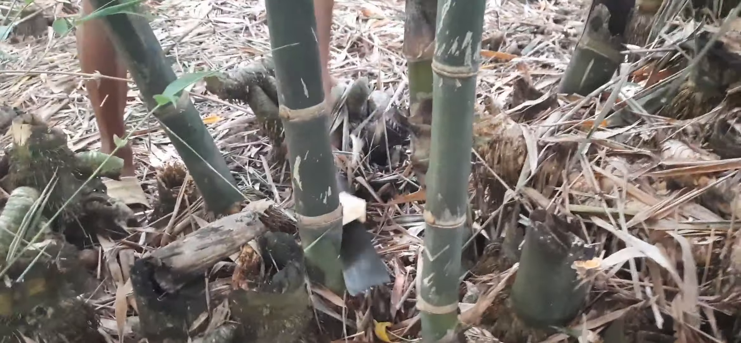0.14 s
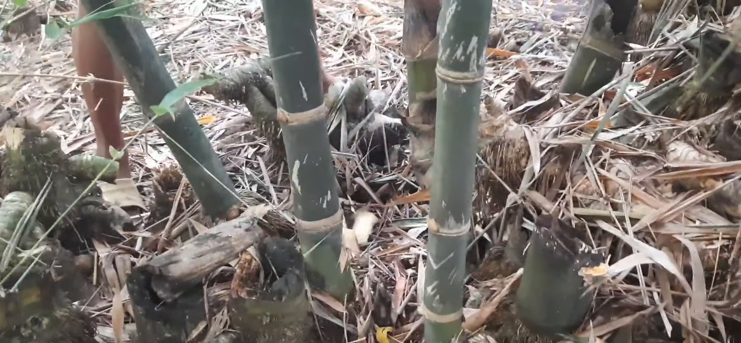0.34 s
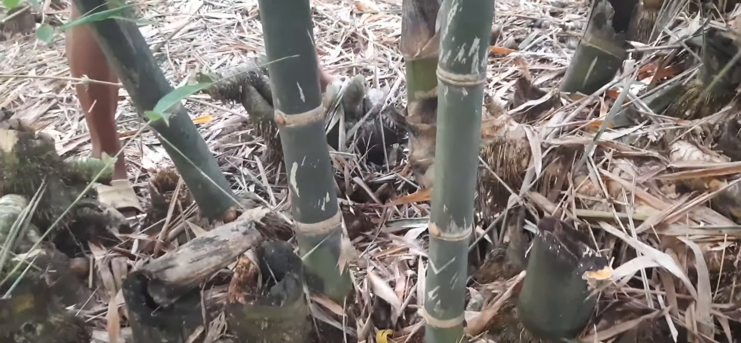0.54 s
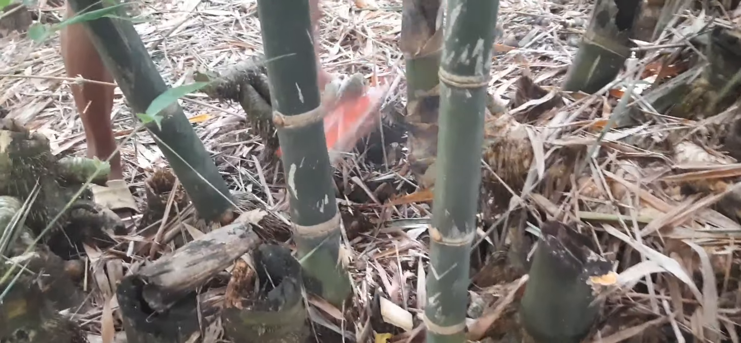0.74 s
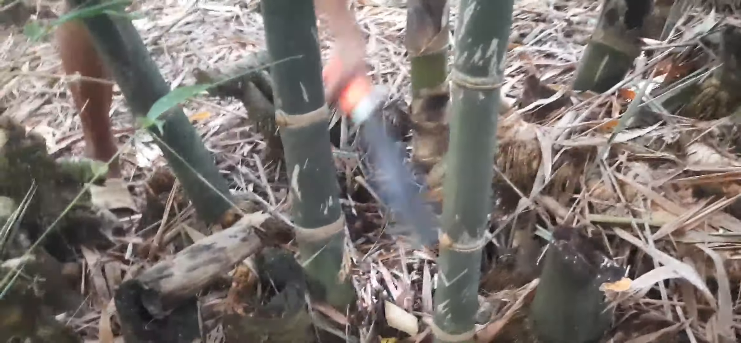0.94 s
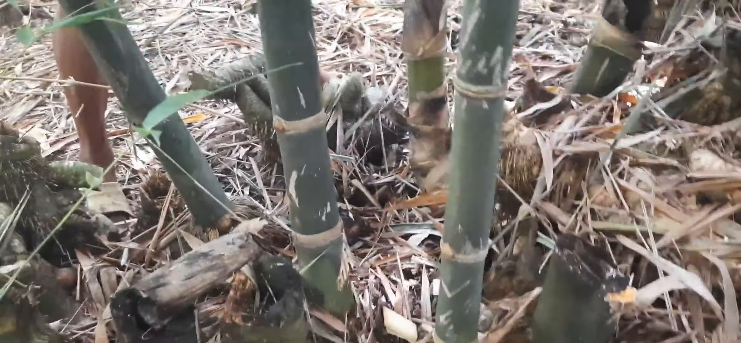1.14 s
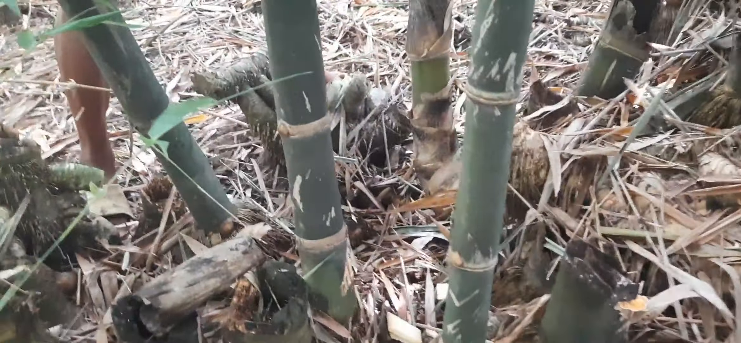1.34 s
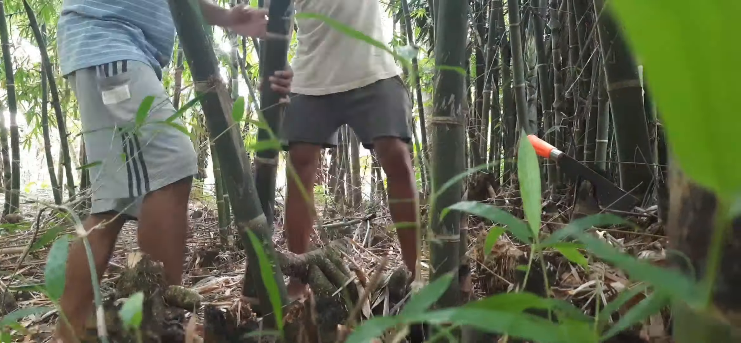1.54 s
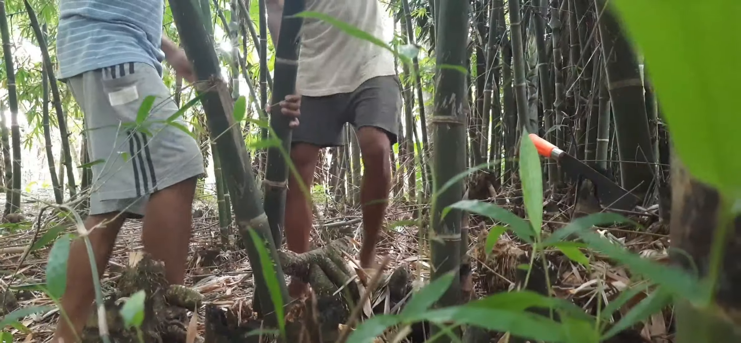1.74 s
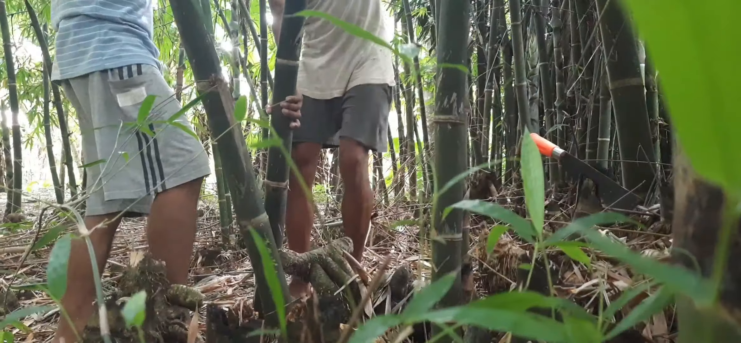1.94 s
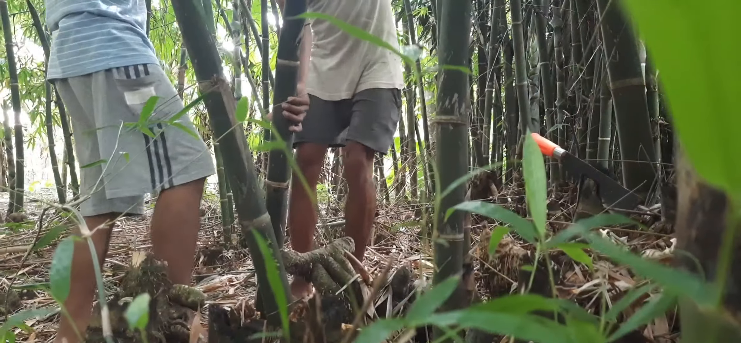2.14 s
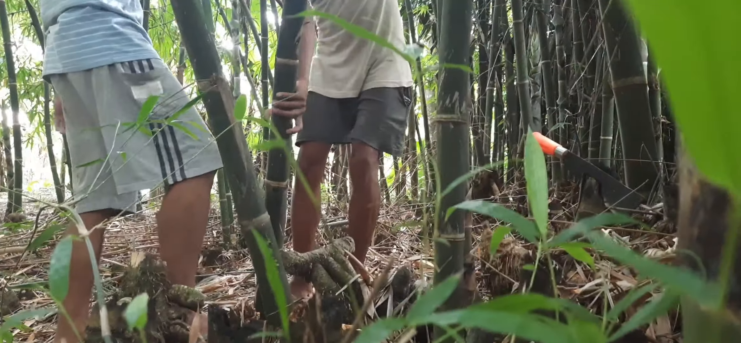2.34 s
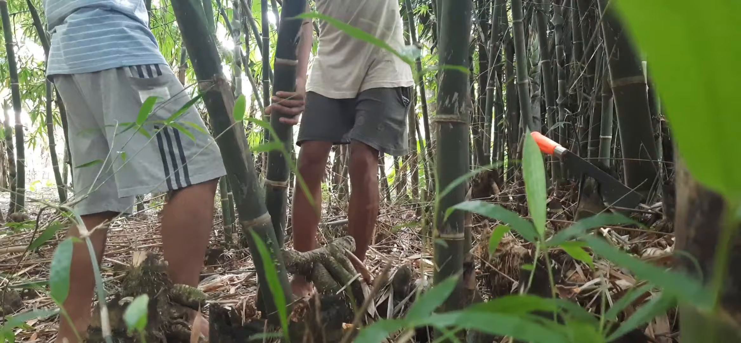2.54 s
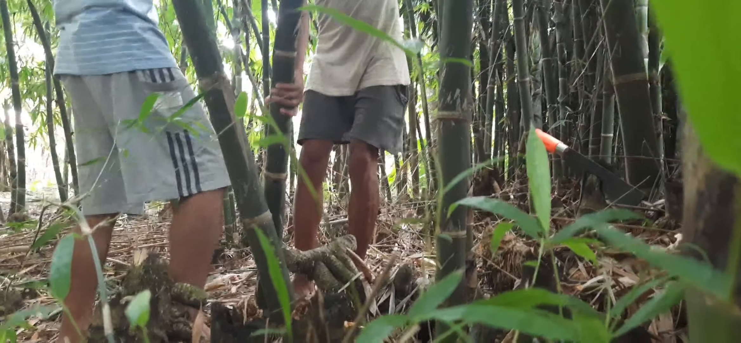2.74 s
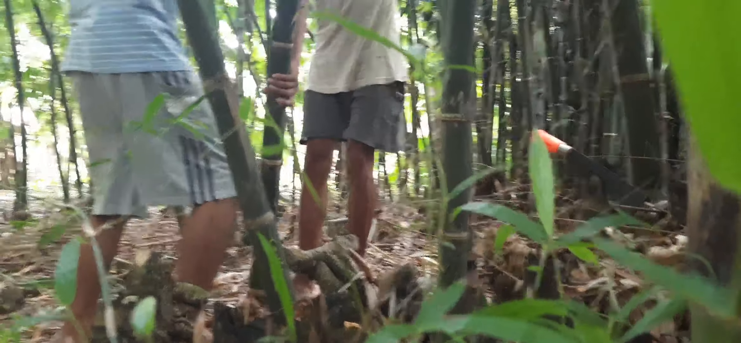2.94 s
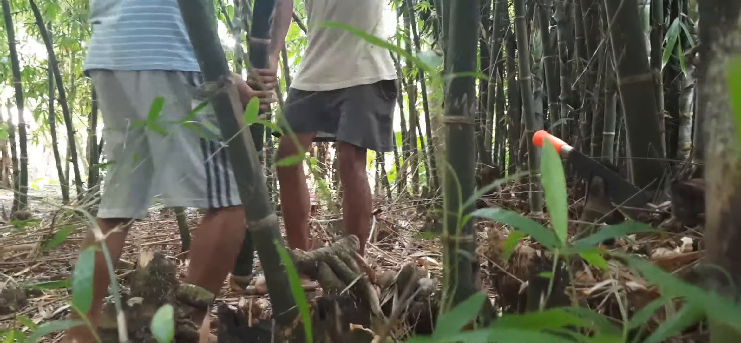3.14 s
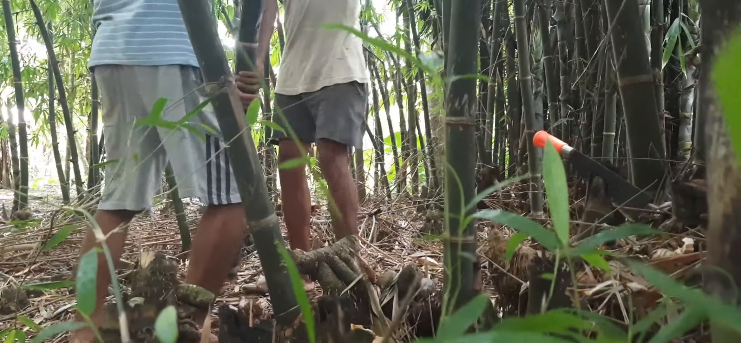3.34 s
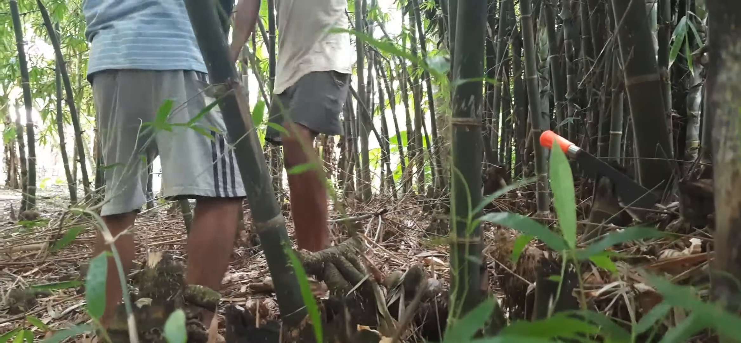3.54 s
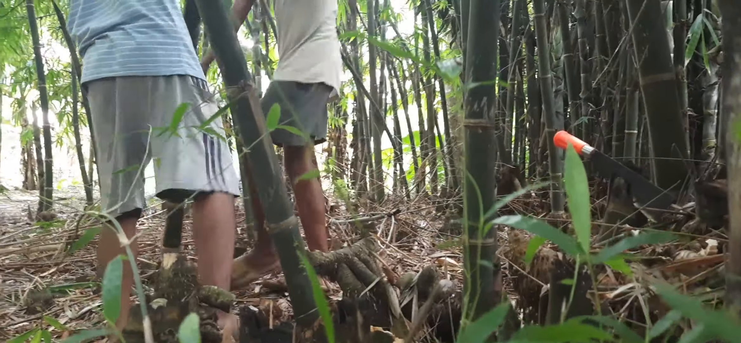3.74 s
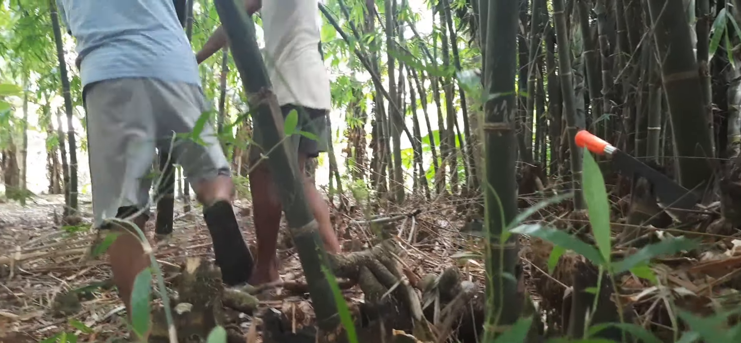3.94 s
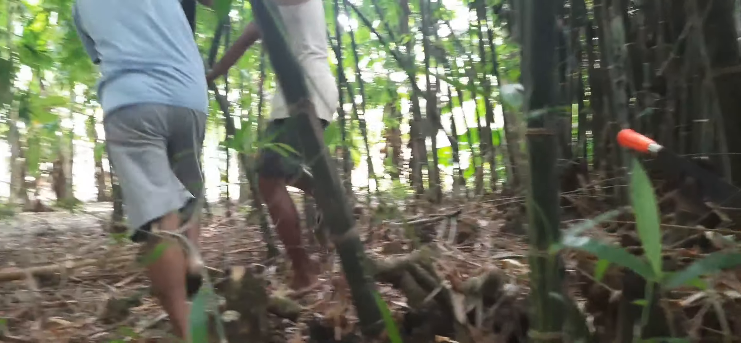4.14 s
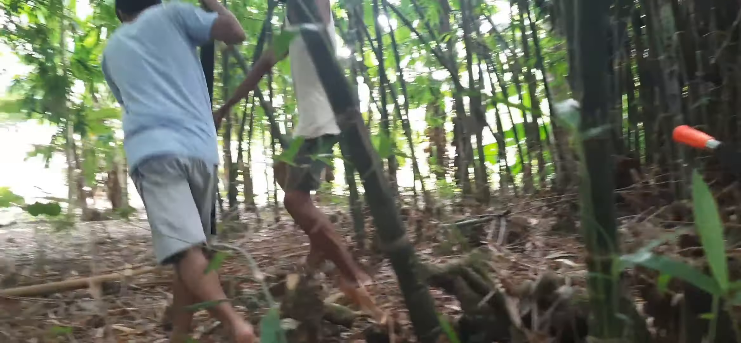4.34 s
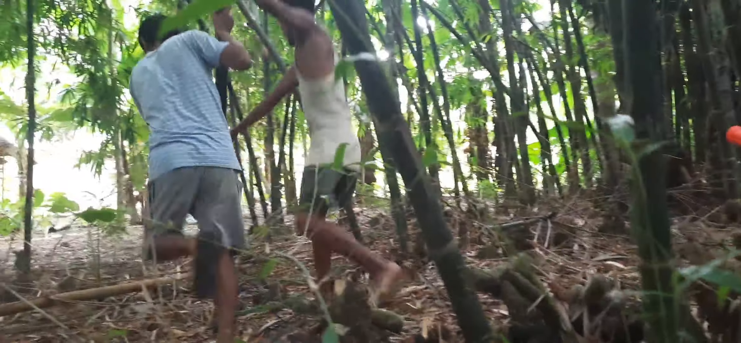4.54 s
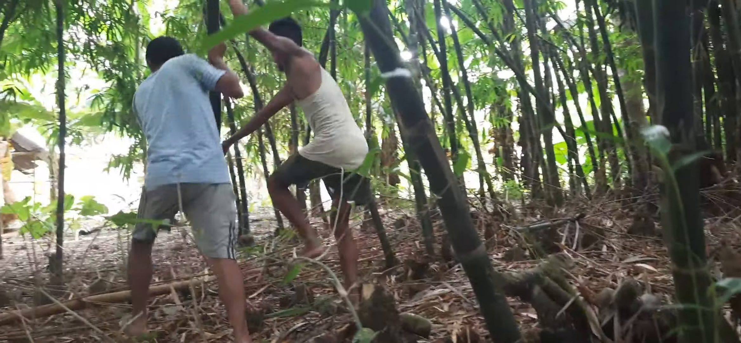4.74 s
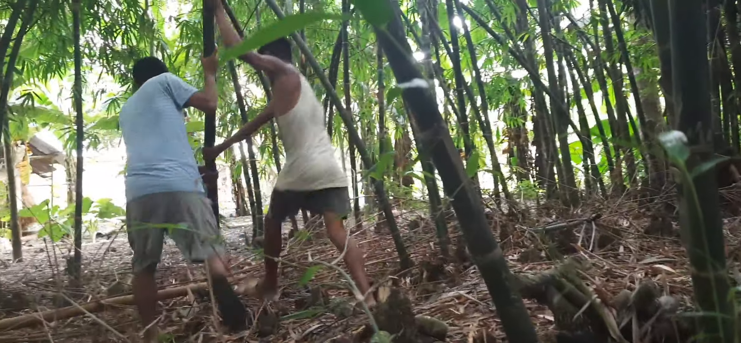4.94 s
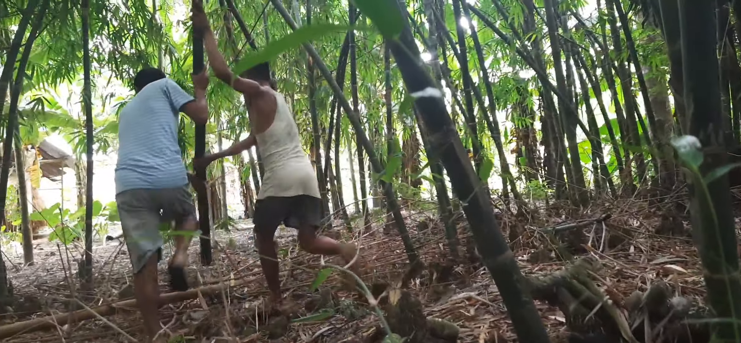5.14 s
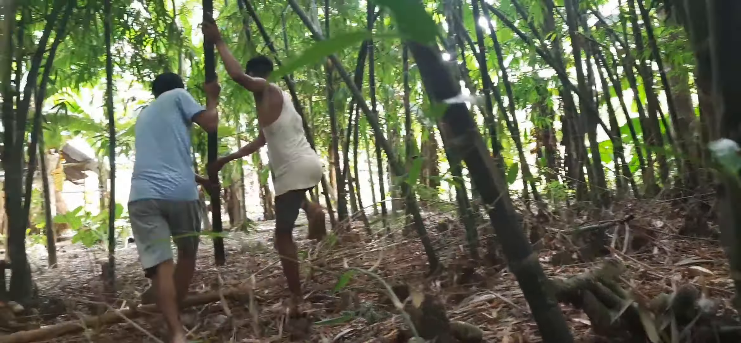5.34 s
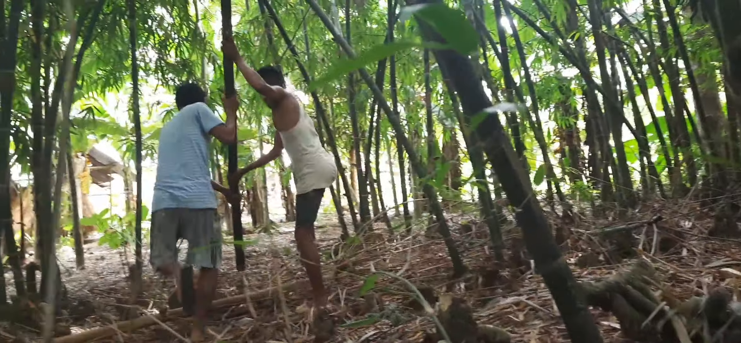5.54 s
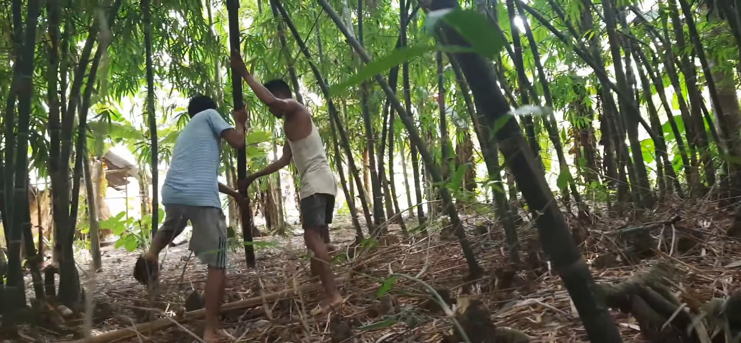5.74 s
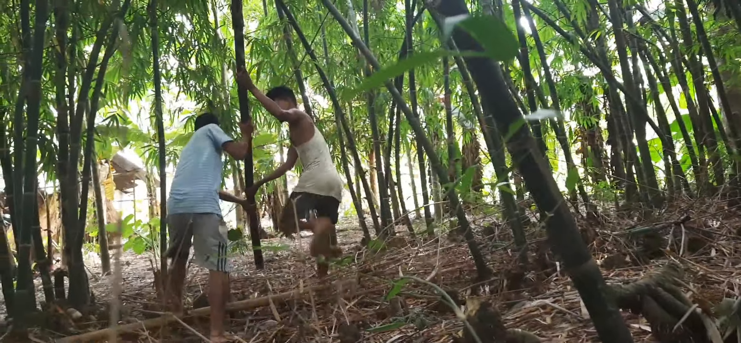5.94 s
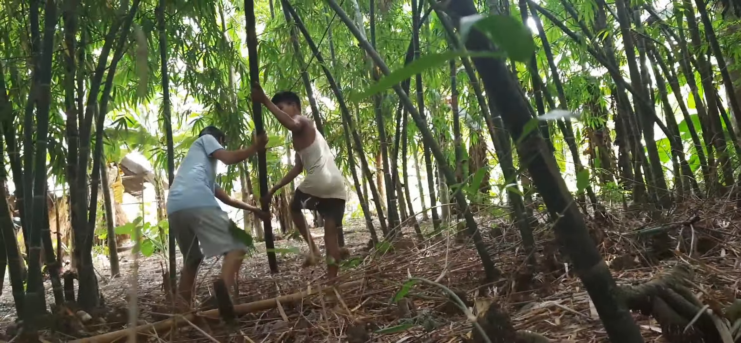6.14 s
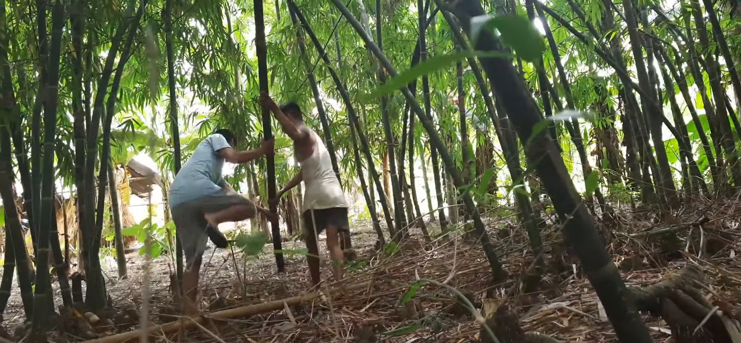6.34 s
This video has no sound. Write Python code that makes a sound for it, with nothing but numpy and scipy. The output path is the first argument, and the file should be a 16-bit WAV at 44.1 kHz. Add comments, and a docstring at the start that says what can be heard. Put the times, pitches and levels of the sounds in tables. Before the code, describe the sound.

Three sharp blade chops ring through a bamboo grove, followed by swelling leaf rustle, snapping twigs and footfalls as the pole is pulled free.

```python
"""A faint bird whistles far off, and at once a machete bites three times into a green bamboo stem nearby.
Each bite bursts the fibres, makes the hollow stem ring and echoes through the grove.
Then the cut pole is dragged out of the clump: the harder the pull, the louder its leafy top rustles
through the others. Stems knock together, twigs snap, and feet shuffle, thud and crunch in the dry
litter on the ground. A low outdoor rumble lies under it all."""
import sys
import numpy as np
from scipy import signal
from scipy.fft import rfft, irfft
from scipy.io import wavfile
from scipy.ndimage import uniform_filter1d

SR = 44100
rng = np.random.default_rng(int(sys.argv[2]) if len(sys.argv) > 2 else 0)


def dump_mix(stems):
    """Bounce the given channels to the path in sys.argv[1] as a 16-bit WAV at rate SR."""
    frames = np.atleast_2d(stems).T  # one column per channel
    limited = np.clip(frames, -1, 1)  # hard clip at full scale
    pcm = np.round(limited * 32767).astype(np.int16)
    wavfile.write(sys.argv[1], SR, pcm)


N = 286650
TIME = np.arange(N) / SR
DRAG_FADE_IN = np.clip((TIME - 1.55) / .02, 0, 1)  # the dragging starts at 1.55 s

# tone of the outdoor air: f/Hz, level/dB
AIR_TONE = [(25, -27.5), (60, -0.5), (110, -3.5), (260, -10), (500, -22.5), (1200, -21.5), (4000, -18.5),
            (16000, -28.5)]
# far bird whistles: t/s, length/s, start f/Hz, end f/Hz, level/dB
WHISTLES = [(0, .08, 5550, 4850, -56), (0, 0.067, 4250, 3390, -53), (.39, .1, 4300, 3780, -59.5),
            (.55, .17, 4450, 3850, -58.5)]
# tone of the dry litter on the ground: f/Hz, level/dB
LITTER_TONE = [(35, -14.5), (90, -3.5), (180, -3.5), (330, -2), (500, -7), (700, -6), (1100, -4.5),
               (2000, -10), (6000, -42.5)]
# how loudly the feet shuffle: t/s, level/dB
SHUFFLE_LEVEL = [(2.9, -80), (3.3, -69.5), (3.98, -56), (4.1, -48.5), (4.39, -49.5), (4.47, -56),
                 (4.56, -48), (5.6, -46.5), (5.8, -50), (6.1, -44), (6.33, -55.5), (6.45, -47)]
# feet crushing the litter: t/s, length/s, level/dB, centre f/Hz
FOOT_CRUNCHES = [(4.044, 0.06, -42.5, 445), (4.518, 0.064, -45.5, 654), (4.939, 0.15, -39, 507)]
# feet and pole landing on the ground: t/s, level/dB, centre f/Hz
GROUND_THUDS = [(.955, -35.5, 450), (1.79, -41.5, 378), (2.14, -52, 300), (3.313, -40, 336),
                (4.035, -31.5, 367), (4.143, -37, 290), (4.706, -29.5, 280), (4.943, -30.5, 101),
                (5.21, -24.5, 306), (5.261, -28.5, 300), (5.402, -27.5, 316), (5.687, -26, 333),
                (5.988, -29.5, 393), (6.42, -31, 375)]
# how hard the pole is pulled, as the loudness of its rustle: t/s, level/dB
PULL_LEVEL = [(1.62, -60), (1.92, -61.5), (2.02, -53), (2.45, -70), (2.65, -67), (2.73, -64.5),
              (3.1, -58.5), (3.25, -54), (3.62, -57), (3.94, -46), (4.38, -43), (4.46, -45), (4.68, -38),
              (4.9, -39.5), (5.05, -35), (5.15, -40.5), (5.35, -41), (5.62, -37.5), (5.76, -42.5),
              (6.05, -36.5), (6.36, -42.5), (6.45, -39)]
# twigs scraping, compared with the leaves: t/s, level/dB
SCRAPE_LEVEL = [(2.66, -7), (2.72, -0.5), (3.1, -3), (6.45, -5)]
# tone of brushing leaves: f/Hz, level/dB
LEAF_TONE = [(1500, -12), (3500, -3.5), (5500, -0.5), (7500, 0), (10000, -5), (13000, 0.5), (16000, -10.5)]
# tone of scraping twigs: f/Hz, level/dB
TWIG_TONE = [(500, -29.5), (1100, -9.5), (1800, 0), (2400, 2.5), (3200, -2.5), (6000, -9.5), (12000, -39.5)]
# stems knocking and twigs snapping: t/s, level/dB, centre f/Hz, decay/s, splinters against the knock/dB
STEM_KNOCKS = [(.651, -66, 6030, .08, 13.5), (1.058, -48.5, 1300, 0.024, -7), (1.181, -53, 1900, .03, 5),
               (1.276, -49.5, 7030, .04, 5), (1.777, -39, 1642, 0.054, -28.5),
               (2.045, -53.5, 5930, 0.029, 15), (3.315, -48, 1700, .04, -15.5),
               (3.423, -48, 1380, 0.053, -14), (3.606, -49, 1000, 0.048, -6),
               (3.738, -44.5, 1280, .015, -20), (3.771, -42.5, 2800, .045, -2),
               (3.889, -39, 1790, 0.15, -14), (4.008, -31, 2080, .036, -15),
               (4.119, -28.5, 1810, .053, -24), (4.221, -34, 1760, 0.072, -12),
               (4.267, -28, 1270, 0.021, -3), (4.334, -30, 2080, .05, -13), (4.37, -25.5, 2030, 0.068, -21),
               (4.755, -31, 3000, .045, -8), (4.791, -27.5, 1890, 0.052, -13),
               (4.981, -36.5, 3500, 0.21, -6), (5.069, -31, 1910, 0.13, 6), (5.212, -29, 2140, 0.045, -3),
               (5.49, -34.5, 2120, .03, -2), (5.5286, -20, 2600, 0.048, 8), (5.612, -31, 2520, 0.074, 1),
               (5.9216, -27.5, 2460, 0.033, 1), (5.996, -33.5, 2420, 0.17, 5),
               (6.066, -26.5, 2210, .12, -4.5), (6.169, -28.5, 2270, 0.084, 0)]
# notes at which the stem's wall and the air inside it ring: f/Hz, level/dB
STEM_NOTES = [(104, 6), (161, 5), (258, 2.5), (314, 7.5), (518, 2.5), (573, 1), (820, 3.5), (1345, 1.5),
              (1681, 3.5), (1794, 3), (1920, -1.5), (2482, 1.5), (4635, -6.5)]
# tone of a blow bouncing off the standing stems: f/Hz, level/dB
GROVE_TONE = [(40, -3), (450, -7.5), (1050, -8), (1500, -5), (1750, -2.5), (2500, -3.5), (2850, -5.5),
              (4900, -4.5), (6300, -8.5), (7500, -12), (16000, -23.5)]
# machete blows: t/s, crack/dB, crack f/Hz, crack sharpness Q, tearing against the crack/dB, tock/dB,
# ring/dB, thump/dB, grove echo/dB, far echo against the near one/dB, length/s
BLOWS = [(0.114, -11.5, 1890, 0.8, -16, -21, -21.5, -31.5, -24.5, -11.5, 1),
         (0.8215, -12, 1970, 2.3, -4, -23.5, -25, -30, -26, -8, .55),
         (1.5229, -10, 4300, 1.4, -5, -25.5, -36, -27, -27, -8.5, 0.052)]
# tone of the left microphone opening: f/Hz, level/dB
LEFT_MIC_TONE = [(1000, 2.5), (2300, 4.5), (3200, -4), (4600, 1), (7000, -2.5), (9000, 6.5), (11500, 6),
                 (14000, 1.5)]
# tone of the right microphone opening: f/Hz, level/dB
RIGHT_MIC_TONE = [(1000, 2.5), (2200, 0.5), (3500, 4.5), (6000, 3.5), (7300, -1.5), (8500, -12),
                  (9700, -25), (11000, -2.5), (13000, 1)]


def undb(db):
    """Turn decibels into a number to multiply by."""
    return 10 ** (np.asarray(db) / 20)


def unit(x):
    """Scale to an average (rms) strength of 1."""
    return x / np.sqrt(np.mean(x ** 2))


def fade(t, t60):
    """Die away smoothly, 60 dB down after t60 seconds."""
    return np.exp(-np.log(1000) * t / t60)


def add(out, start, x):
    """Mix x into out at start seconds."""
    i = min(max(int(start * SR), 0), N)
    out[:, i:i + x.shape[-1]] += x[..., :N - i]


def curve(points):
    """Join (time, level) points with straight lines."""
    return np.interp(TIME, *np.transpose(points))


def freqs(x):
    """The frequencies in x's spectrum, nudged to avoid zero."""
    return np.fft.rfftfreq(x.shape[-1], 1 / SR) + 0.00071


def colour(x, tone):
    """Filter x by a table of (frequency, level) points."""
    hz, db = np.transpose(tone)
    gain = undb(np.interp(np.log(freqs(x)), np.log(hz), db))
    return irfft(rfft(x) * gain, x.shape[-1])


def resonate(x, hz, q):
    """Keep a band around hz, at strength 1; a higher q makes it narrower."""
    f = freqs(x)
    return unit(irfft(rfft(x) / (1 + 1j * q * (f / hz - hz / f)), x.shape[-1]))


def noise(n, apart_hz=1100):
    """Hiss from all around: left and right are alike in the low middle, unrelated above and below."""
    white = rng.standard_normal((2, n))
    f = freqs(white)
    alike = .93 / (1 + (f / apart_hz) ** 4 + (70 / f) ** 4)
    mid, side = rfft(white)
    mid, side = mid * np.sqrt(1 + alike), side * np.sqrt(1 - alike)
    return unit(irfft([mid + side, mid - side], n))


def crackle(n, per_s, spread_db):
    """Tiny clicks of unequal size, each with its own delay between left and right."""
    count = int(per_s * n / SR)
    at = rng.integers(0, n, count)
    lag = rng.integers(-14, 15, count)
    size = undb(spread_db * np.minimum(rng.exponential(size=count), 5)) * rng.choice([-1, 1], count)
    return unit(np.array([np.bincount(at, size, n), np.bincount((at + lag) % n, size, n)]))


def wander(per_s):
    """Glide to a new random value per_s times a second."""
    hold = max(int(SR / per_s), 1)
    steps = np.repeat(rng.standard_normal(N // hold + 1), hold)
    return unit(uniform_filter1d(steps, hold)[:N])


def echoes(x, t60):
    """Dense echoes of x from the stems all around, about as strong as x."""
    t = TIME[:SR]
    tail = noise(len(t)) * fade(t, t60) * (1 - np.exp(-t / 0.016))
    return signal.fftconvolve(x, tail / np.sqrt(np.sum(tail ** 2) / 2), axes=1)[:, :N]


def air(level_db=-64):
    """Low outdoor rumble and a faint stir of leaves."""
    return unit(colour(noise(N), AIR_TONE)) * undb(level_db + 3.2 * wander(2.6))


def birds(waver=0.07):
    """Falling, trilled whistles, smeared by distance."""
    out, wobble = np.zeros((2, N)), wander(370)
    for start, length, start_hz, end_hz, db in WHISTLES:
        progress = np.linspace(0, 1, int(length * SR))
        hz = (start_hz + (end_hz - start_hz) * progress) * (1 + waver * wobble[:len(progress)])
        whistle = np.sin(2 * np.pi * np.cumsum(hz) / SR)
        add(out, start, undb(db) * 2 * np.sqrt(1 - progress) * whistle)
    return echoes(out, t60=0.58)


def shuffle():
    """Feet stir the dry litter, which gives many small, dull clicks."""
    sticks = crackle(N, per_s=900, spread_db=1.63)
    litter = unit(colour(sticks + 1.46 * echoes(sticks, t60=0.27), LITTER_TONE))
    return DRAG_FADE_IN * litter * undb(curve(SHUFFLE_LEVEL) + 1.8 * wander(30))


def crunches(press_s=0.0068, echo_db=-10):
    """Dry husks and sticks give way under a foot in coarse grains, until the weight has settled."""
    out, t = np.zeros((2, N)), TIME[:SR // 4]
    for start, length, db, hz in FOOT_CRUNCHES:
        clicks = crackle(len(t), per_s=450, spread_db=-1.5)
        grains = resonate(resonate(clicks, hz, 0.47), hz, 0.31)
        weight = np.minimum(t / press_s, 1) * np.sqrt(np.clip(1 - t / length, 0, 1))
        add(out, start, undb(db) * grains * weight)
    return out + undb(echo_db) * echoes(out, t60=0.2)


def thuds(bump_cycles=10, crunch_cycles=15, toe_delay_s=.022, toe_db=-8.5, echo_db=-12):
    """A soft bump and a dull crunch land twice, like heel then toe; deeper thuds last longer."""
    out, t = np.zeros((2, N)), TIME[:SR // 2]
    for start, db, hz in GROUND_THUDS:
        for delay, contact_db in ((0, 0), (toe_delay_s, toe_db)):
            bump = np.sin(2 * np.pi * hz * t) * fade(t, bump_cycles / hz)
            crunch = resonate(resonate(noise(len(t)), hz, 1.32), hz, 0.5) * fade(t, crunch_cycles / hz)
            thud = (1.2 * bump + undb(-2) * crunch) * np.minimum(t * hz, 1)
            add(out, start + delay, undb(db + contact_db) * thud)
    return out + undb(echo_db) * echoes(out, t60=0.44)


def leafy_top(snap_db=-6):
    """Countless dry leaves brush past each other in small surges while twigs scrape and snap."""
    surge = wander(45)
    hiss = unit(colour(crackle(N, per_s=3500, spread_db=2.7) + noise(N), LEAF_TONE))
    ticks = crackle(N, per_s=700, spread_db=2.9)
    scrape = unit(colour(ticks + 1.43 * echoes(ticks, t60=0.29), TWIG_TONE)) * undb(2.17 * surge)
    # each small snap frees a burst of noise that dies quickly
    breaks = np.abs(crackle(N, per_s=70, spread_db=3.6)[0])
    bursts = signal.fftconvolve(breaks, fade(TIME[:SR // 10], 0.05))[:N]
    snaps = unit(bursts * resonate(resonate(noise(N), 2300, 1.0), 2100, 0.74))
    leaves = hiss * undb(1.1 * surge + 0.69 * wander(160))
    twigs = undb(curve(SCRAPE_LEVEL)) * (scrape + undb(snap_db) * snaps)
    return DRAG_FADE_IN * undb(curve(PULL_LEVEL)) * (leaves + twigs)


def knocks(clack_cycles=16, hollow_hz=620, hollow_db=-11, shake_db=-16, echo_db=-7):
    """Hollow stems clack and grate over a low tock; splinters spray and the jolt shakes the leaves."""
    out, t = np.zeros((2, N)), TIME[:SR // 4]
    n = len(t)
    for start, db, hz, t60, splinter_db in STEM_KNOCKS:
        clack = np.sin(2 * np.pi * hz * t) * fade(t, clack_cycles / hz)
        grate = resonate(resonate(noise(n), hz, 2.5), hz, 0.19)
        hollow = undb(hollow_db) * resonate(resonate(noise(n), hollow_hz, 0.61), hollow_hz, 0.78)
        spray = fade(t, 0.47 * t60) + undb(shake_db) * fade(t, 0.18)
        splinters = resonate(crackle(n, per_s=18000, spread_db=1.24), 9800, 0.67) * spray
        knock = clack + (grate + hollow) * fade(t, t60) + undb(splinter_db) * splinters
        add(out, start, undb(db) * knock)
    return out + undb(echo_db) * echoes(out, t60=0.2)


def grove_echo(t, far_db):
    """A blow bounces off the near stems, and off the far ones for longer."""
    near = unit(colour(noise(len(t)), GROVE_TONE)) * fade(t, 0.41)
    far = resonate(colour(noise(len(t)), GROVE_TONE), 4400, 0.79) * fade(t, 0.84)
    return near + undb(far_db) * far


def through_stem(x, q):
    """Sound that has rung through the notes of the hollow stem, at strength 1."""
    f = freqs(x)
    power = sum(undb(2 * db) / (1 + (q * (f / hz - hz / f)) ** 2) ** 2 for hz, db in STEM_NOTES)
    return unit(irfft(rfft(x) * np.sqrt(power), x.shape[-1]))


def stem_ring(t, far_db=-19):
    """The ring comes back from near stems; from far ones mostly the wall's high notes return."""
    near = through_stem(noise(len(t)), q=24) * fade(t, 0.26)
    far = resonate(through_stem(noise(len(t)), q=13), 2700, 1.7) * fade(t, 0.84)
    return near + undb(far_db) * far


def recoil(t, delay_s=.026, start_hz=715, sag_s=.012):
    """Just after each bite the stem jolts in its roots: a short woody thump that sinks in pitch."""
    since = np.maximum(t - delay_s, 0)
    hz = start_hz / (1 + since / sag_s) * (since > 0)
    return undb(-29) * 2 * np.sin(2 * np.pi * np.cumsum(hz) / SR) * fade(since, .055)


def stem_tock(t, after_bite, below_hz=1000):
    """The push of the blade sets off all the stem's low notes at once."""
    notes = sum(undb(db) * np.sin(2 * np.pi * hz * t + rng.uniform(0, 2 * np.pi))
                for hz, db in STEM_NOTES if hz < below_hz)
    return 2 * notes / np.max(np.abs(notes)) * fade(after_bite, .03)


def fibre_crack(t, after_bite, hz, q, tear_db):
    """Fibres burst and the skin snaps as the blade sinks in; fine fibres tear on after it stops."""
    n = len(t)
    fibres = resonate(resonate(noise(n), hz, q), hz, 0.44) * fade(after_bite, 0.028)
    skin = undb(-4) * resonate(noise(n), 4900, 2.9) * fade(after_bite, 0.019)
    tear_fade = fade(after_bite, 0.011) + undb(-14.5) * fade(t, 0.23)
    tearing = undb(tear_db) * resonate(noise(n), 11000, 0.98) * tear_fade
    return fibres + skin + tearing


def machete(bite_s=0.0031, attack_s=0.0016, swell_s=0.0081, thump_hz=130):
    """Each blow cracks into the stem, which tocks and rings; the roots thump and the grove answers."""
    out, t = np.zeros((2, N)), TIME[:SR]
    after_bite = np.maximum(t - bite_s, 0)
    for start, crack_db, hz, q, tear_db, tock_db, ring_db, thump_db, grove_db, far_db, length in BLOWS:
        crack = undb(crack_db) * fibre_crack(t, after_bite, hz, q, tear_db)
        tock = undb(tock_db) * stem_tock(t, after_bite)
        ring = undb(ring_db) * stem_ring(t)
        rumble = resonate(resonate(noise(len(t)), thump_hz, 0.5), thump_hz, 0.25)
        thump = undb(thump_db) * rumble * fade(t, 0.39)
        grove = undb(grove_db) * grove_echo(t, far_db)
        strike = (crack + tock) * np.minimum(t / attack_s, 1)
        body = (ring + thump + grove + recoil(t)) * np.minimum(t / swell_s, 1)
        fade_out = np.clip((1 - t / length) / 0.35, 0, 1)  # the last blow stops short
        add(out, start, (strike + body) * fade_out)
    return out


def scene():
    """The grove and the work in it, in stereo."""
    return machete() + leafy_top() + shuffle() + birds() + air() + knocks() + thuds() + crunches()


def record(dry, top_hz=16000):
    """Each microphone opening has its own tone; loud peaks are rounded and the highest treble is cut."""
    mics = np.array([colour(dry[0], LEFT_MIC_TONE), colour(dry[1], RIGHT_MIC_TONE)])
    treble_cut = signal.ellip(10, .2, 80, top_hz, fs=SR, output="sos")
    return signal.sosfilt(treble_cut, np.tanh(mics))


dry = scene()
out = record(dry)
dump_mix(out)
```